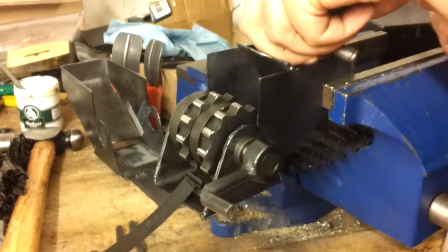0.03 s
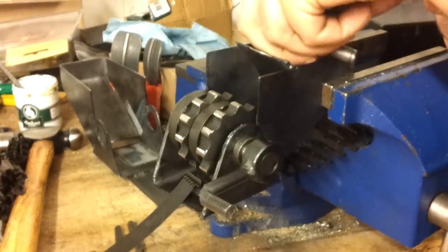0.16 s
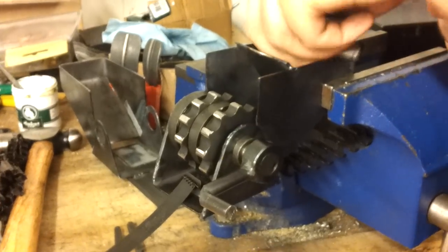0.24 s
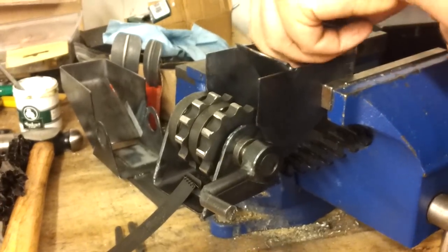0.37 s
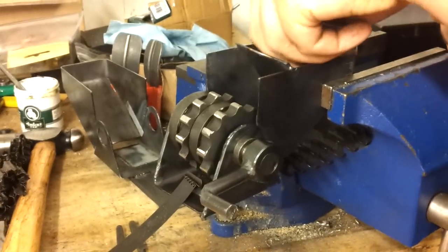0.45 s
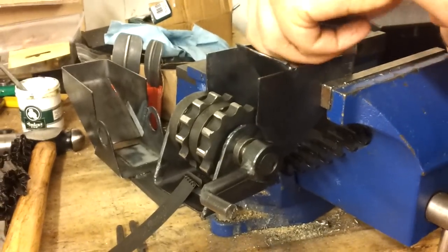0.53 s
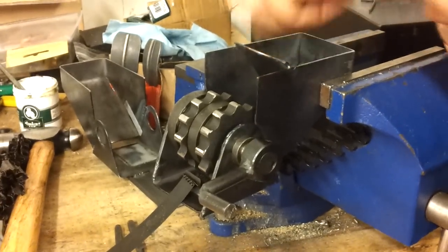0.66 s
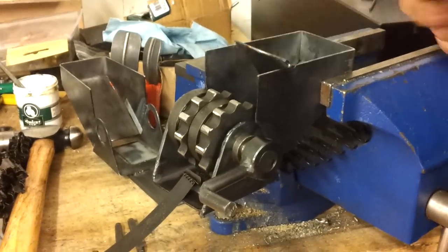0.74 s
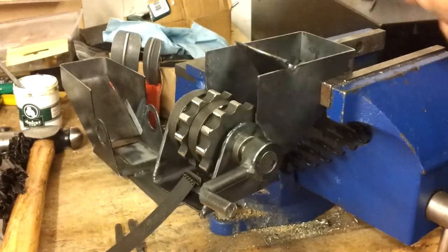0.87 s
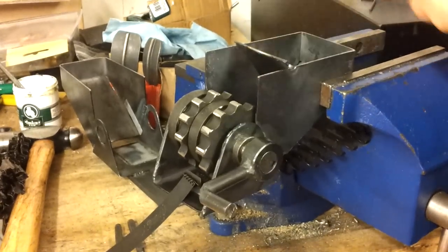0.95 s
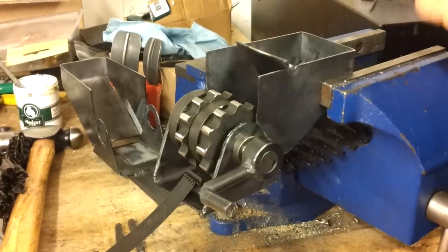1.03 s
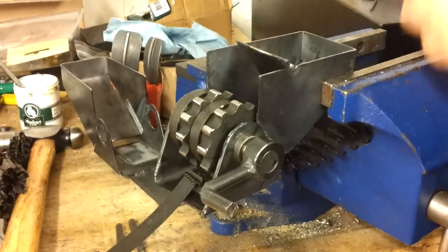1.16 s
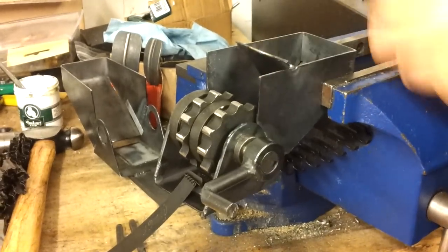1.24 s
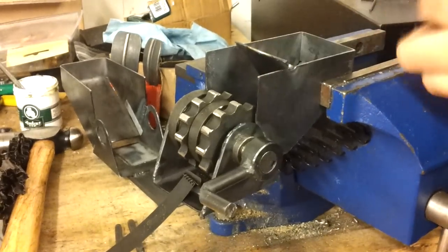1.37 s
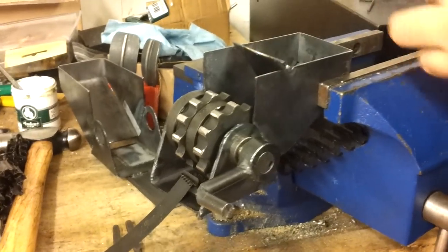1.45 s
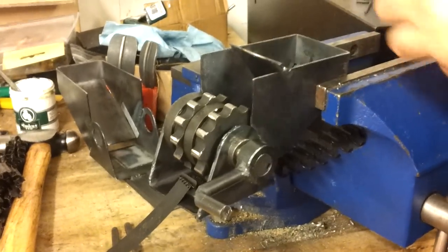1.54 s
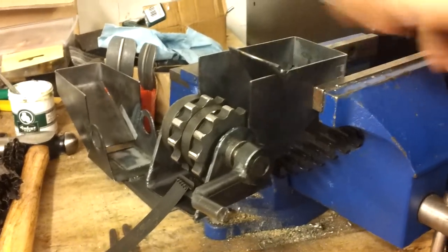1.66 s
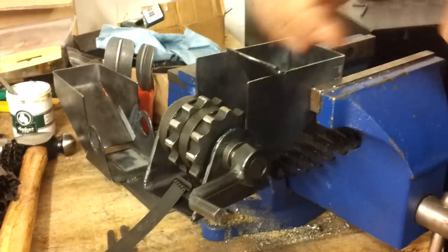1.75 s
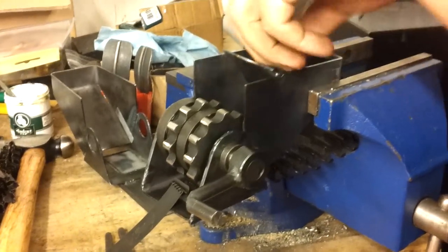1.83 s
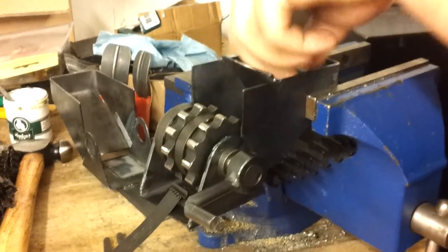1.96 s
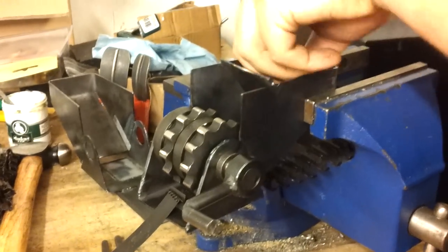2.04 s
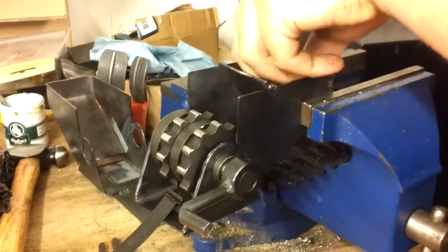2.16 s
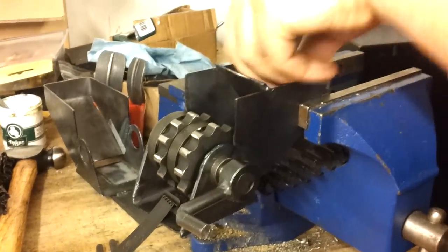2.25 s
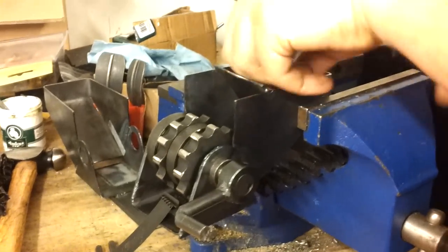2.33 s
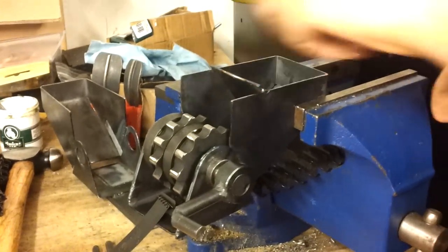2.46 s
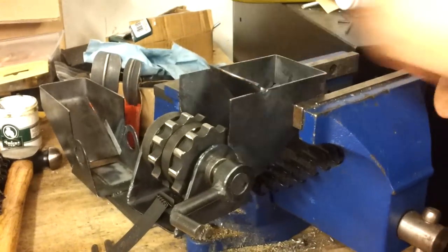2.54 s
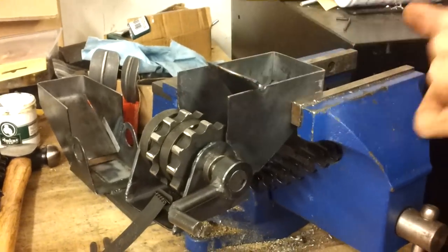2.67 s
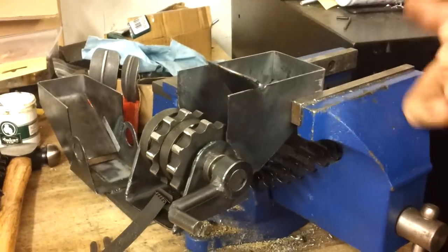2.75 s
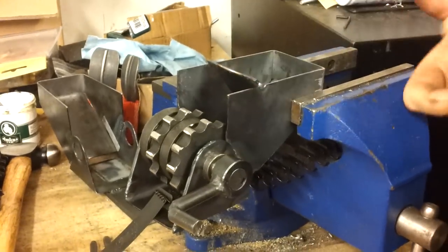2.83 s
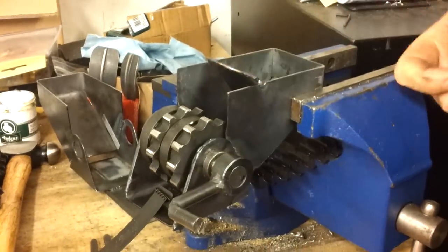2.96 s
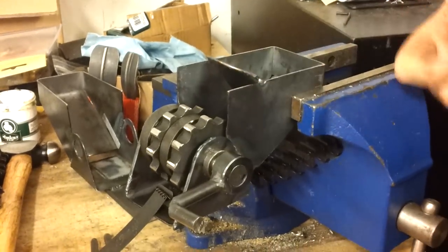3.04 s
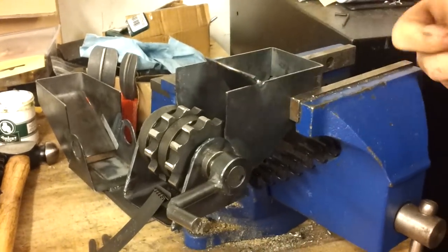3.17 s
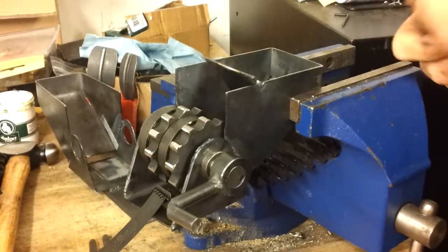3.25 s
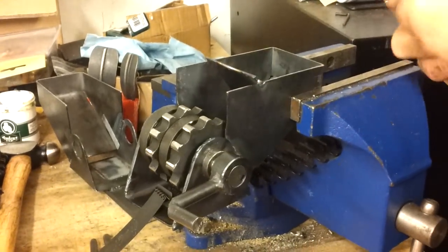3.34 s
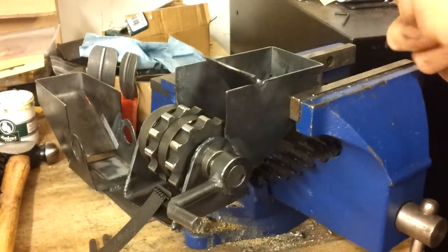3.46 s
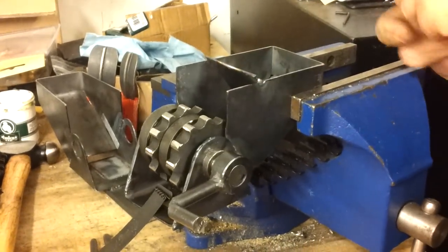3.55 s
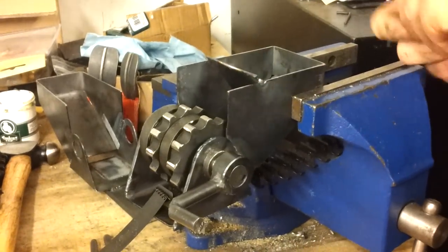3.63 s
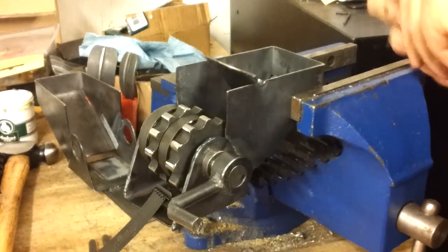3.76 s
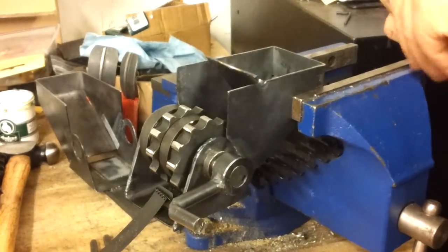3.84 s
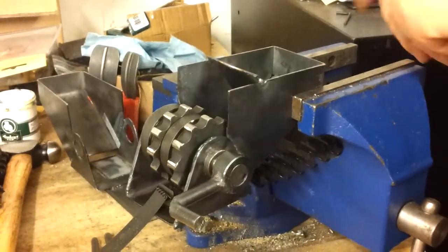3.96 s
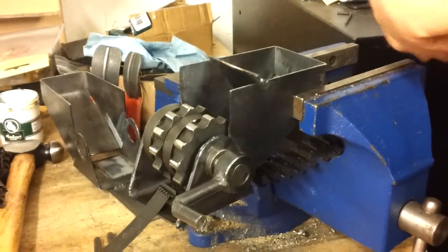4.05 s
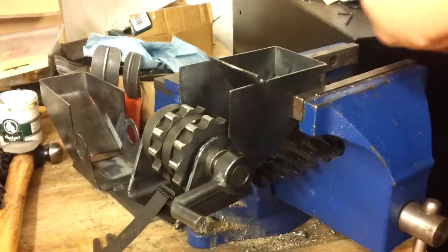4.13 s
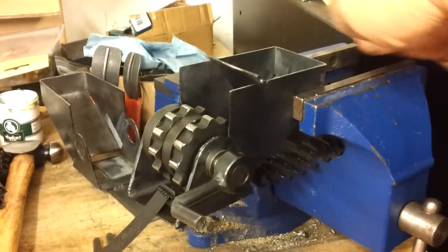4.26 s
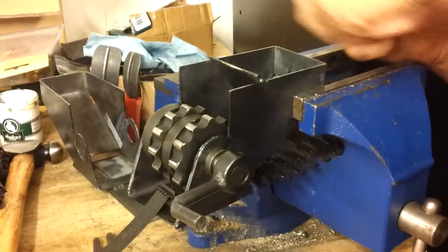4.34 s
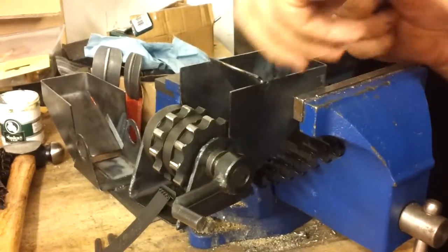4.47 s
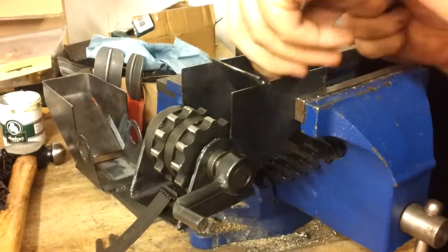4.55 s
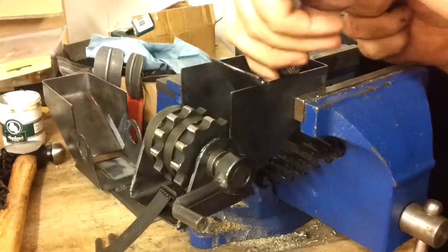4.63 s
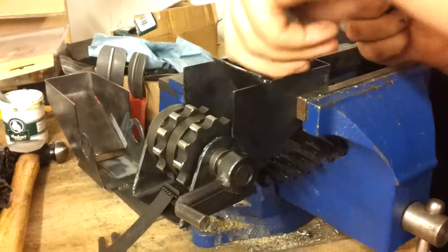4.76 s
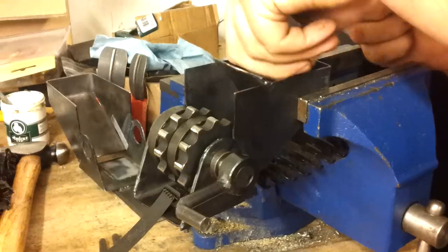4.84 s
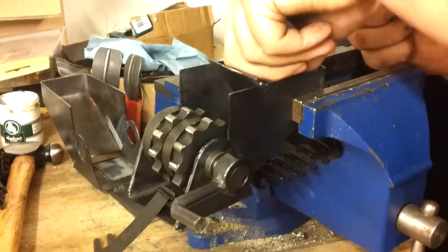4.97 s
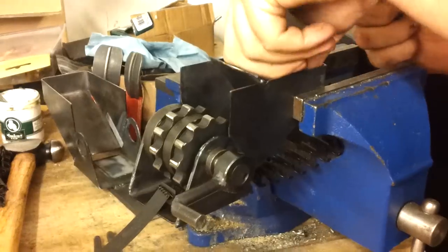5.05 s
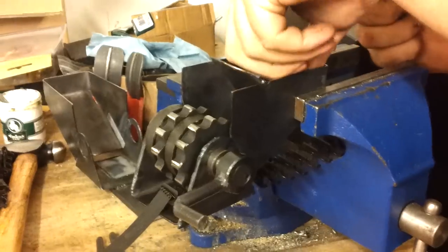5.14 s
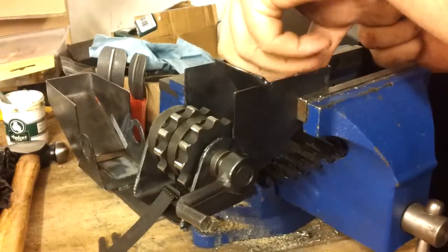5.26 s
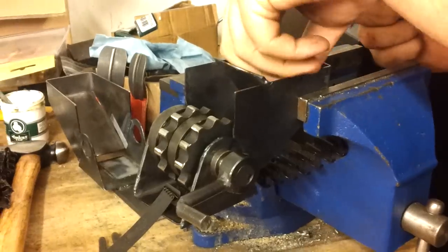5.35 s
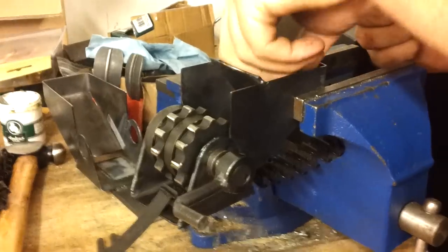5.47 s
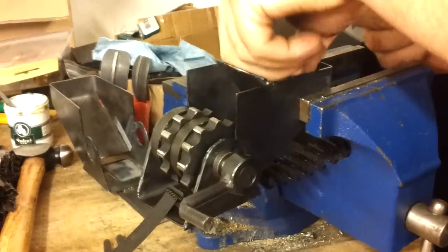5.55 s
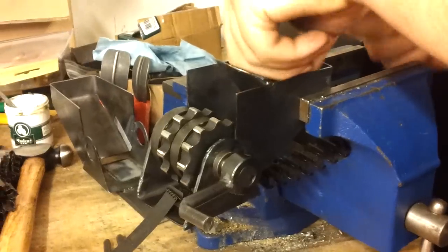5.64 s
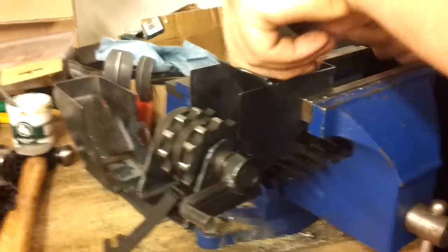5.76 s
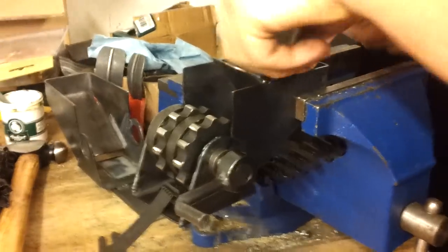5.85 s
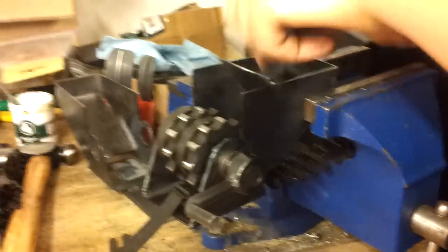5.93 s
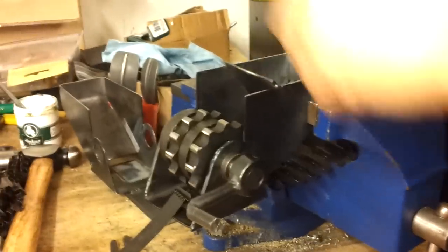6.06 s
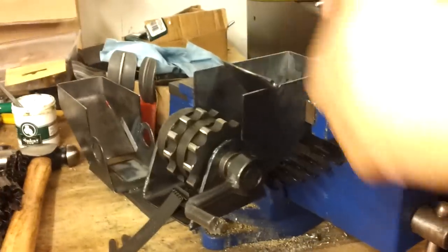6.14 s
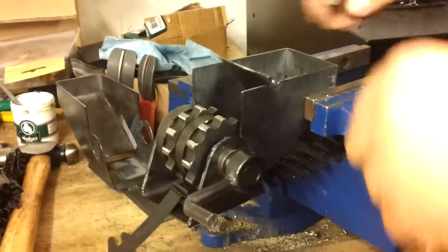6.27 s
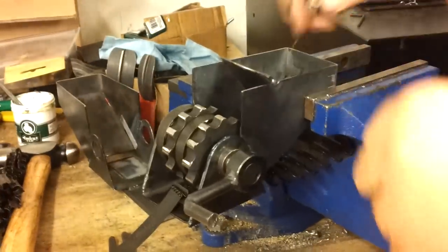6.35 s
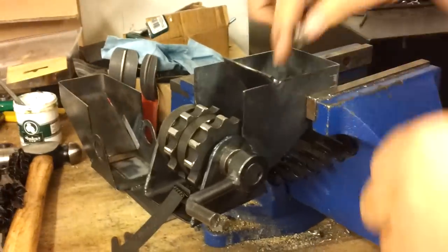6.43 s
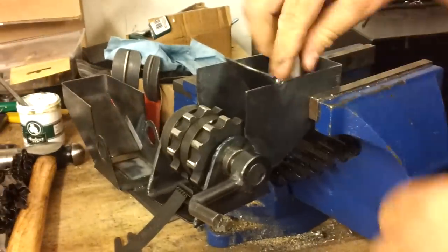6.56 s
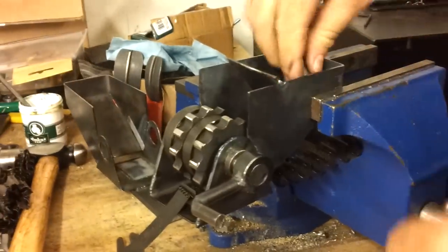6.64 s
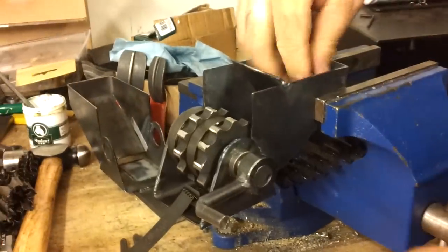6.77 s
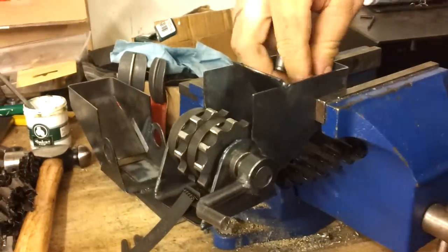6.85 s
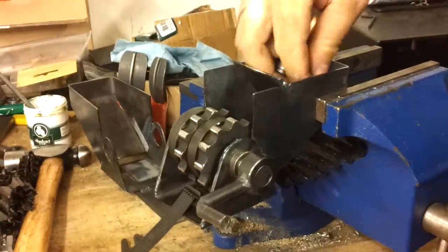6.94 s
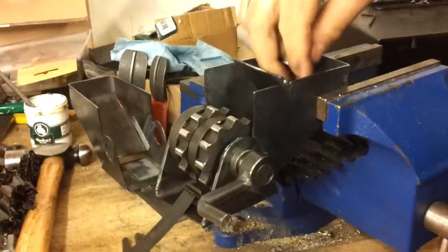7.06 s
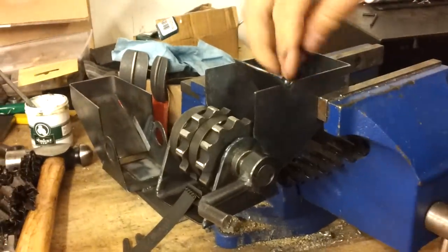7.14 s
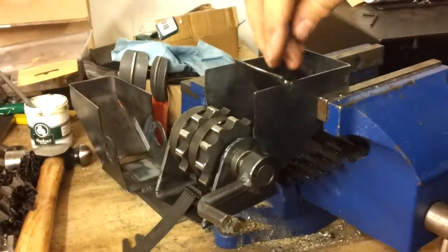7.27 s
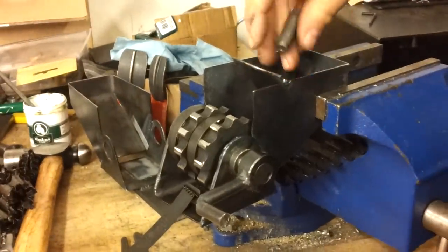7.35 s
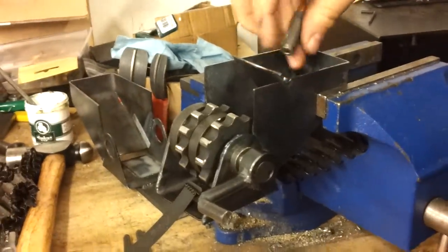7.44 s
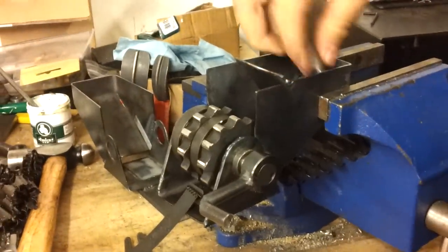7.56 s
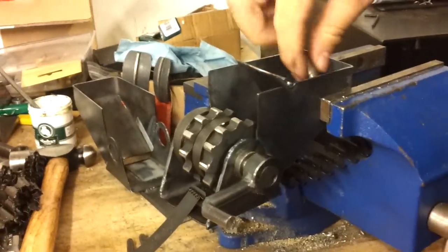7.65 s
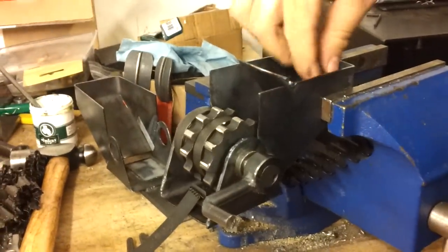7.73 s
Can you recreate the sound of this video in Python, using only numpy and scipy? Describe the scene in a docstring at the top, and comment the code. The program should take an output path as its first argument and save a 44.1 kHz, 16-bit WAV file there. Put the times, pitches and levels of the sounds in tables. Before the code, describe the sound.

Handfuls of metal cartridges clatter into a sheet-steel hopper in bursts, with tiny clinks in the fingers between them, in a quiet workshop.

```python
"""Metal cartridges drop by the handful into a sheet-steel hopper: clicks and patter ring damped modes,
with short buzzes and noise cracks; each blow also ticks, rings the side wall and thuds into a vice.
A few blows knock the bench. Between handfuls cases clink in the fingers, and a sleeve hisses by once.
Hiss, rumble and faint wavering tones make the room; sparse echoes follow the metal.
The output is nearly mono, ducked after loud blows, band limited and held below full scale."""
import sys
import numpy as np
from scipy import signal
from scipy.fft import rfft, irfft
from scipy.io import wavfile
from scipy.ndimage import uniform_filter1d, minimum_filter1d

SR = 44100
rng = np.random.default_rng(int(sys.argv[2]) if len(sys.argv) > 2 else 0)


def transcribe(signal):
    """Save signal, clipped to [-1, 1], as a 16-bit WAV file at the path in sys.argv[1]."""
    frames = np.atleast_2d(signal).T
    limited = np.clip(frames, -1, 1)
    pcm = np.round(limited * 32767).astype(np.int16)
    wavfile.write(sys.argv[1], SR, pcm)


N = 343980
TIME_S = np.arange(N) / SR

# cartridges striking the hopper: start_s, blow_db, boom_db (side wall above the blow)
HOPPER_BLOWS = [(0.002, -28.5, 1), (0.078, -28.5, 4.5), (0.156, -2, -9), (0.1641, -6.5, 10),
                (0.194, -12, 5.5), (0.2354, -23, 2.5), (0.292, -9.5, 0.5), (0.3189, -5.5, -3),
                (0.4372, -2, -6), (0.4461, -11, 14), (0.4744, -5.5, -10.5), (0.5162, -8.5, 5.5),
                (0.5404, -10.5, 0), (0.593, -23, 15), (0.625, -8.5, -5), (0.65, -10.5, -4.5),
                (1.8107, -4, -5.5), (1.85, -15, -11), (1.9211, -17, -30.5), (1.9747, -16.5, 5),
                (1.999, -28.5, -11), (2.1336, -2, 1.5), (2.149, -7, -6), (2.1769, -5, 2), (2.2163, -1, -1),
                (2.2727, -4, -12.5), (2.2851, -7, -1.5), (2.3084, -7, -0.5), (2.3539, -16.5, -19),
                (4.5328, -10, -8), (4.6055, -28, -4), (4.6554, -23.5, 3.5), (4.677, -26.5, 7),
                (4.691, -14.5, -13.5), (4.7, -4, -9), (4.8794, 0.5, 0), (4.9024, -10.5, -13),
                (4.9514, -1.5, -7.5), (5.002, -15, -38), (5.024, -3.5, 2), (5.0304, -7.5, -2),
                (5.0582, -12, 12), (5.0774, -5.5, -21), (5.1884, -2, -12), (5.206, -15.5, -1),
                (5.2297, -13.5, -22), (5.278, -21, -25), (5.3115, -10.5, -13), (5.338, -31, -10),
                (5.4309, -14.5, -15.5), (5.443, -22, -35), (5.5648, -19.5, -6), (5.5923, -16, -6),
                (5.6248, -4.5, -11), (5.6574, -30, -8), (5.671, -10, 2.5), (5.685, -1.5, -3.5),
                (5.701, -12.5, -30), (5.7681, -13, -0.5), (6.7582, -7, -14.5), (6.8368, -24.5, -19),
                (6.9296, -0.5, -13), (6.9908, -3.5, 2), (7.0797, -2.5, -25), (7.1153, -19, -41),
                (7.7142, -3, -30.5), (7.79, -14.5, -42.5)]
# cartridges touching in the hand: start_s, clink_db, tinkle_db (above the clink)
HAND_CLINKS = [(0.854, -32, 6.5), (0.873, -28.5, -1), (1.6087, -38.5, -30), (2.6717, -49, -21),
               (2.7052, -19.5, -14), (2.733, -32, 2), (2.853, -30.5, -4.5), (2.937, -36.5, -11),
               (3.01, -40.5, -18), (3.0636, -27, -12), (3.109, -38, -19), (3.221, -42.5, -15),
               (3.3325, -24, -13), (3.3403, -26.5, -8), (3.4386, -29, -2.5), (3.5056, -37, -14),
               (3.5687, -32.5, -10), (3.7452, -31.5, -20), (3.8144, -16.5, 0), (3.8516, -29, -1),
               (3.9016, -39, -20), (3.935, -34.5, -24), (4.0974, -27.5, -6), (4.225, -35, -15),
               (4.24, -42, -18), (4.285, -27, -7.5), (4.341, -40.5, -7), (5.9732, -40.5, -21),
               (6.4393, -28, -17), (6.7005, -41, -15)]
# blows felt in the bench: start_s, level_db
BENCH_KNOCKS = [(0.152, -37.5), (1.81, -42), (5.682, -34.5), (6.761, -41), (6.989, -32)]
# fingers shifting the cases: time_s, level_db
FINGER_RUSTLE = [(2.62, -49), (3.3, -64), (3.9, -54), (4.5, -52.5)]
# modes of the hopper: pitch_hz, level_db, t60_s
HOPPER_MODES = [(1276, -5.5, 0.26), (1345, -3.5, .15), (1402, -0.5, 0.16), (1499, 0, 0.034),
                (1677, 1, 0.08), (1970, 5.5, 0.048), (2083, -4, 0.27), (2129, -3.5, .15), (2571, 4.5, 0.16),
                (3010, -6.5, 0.08), (3060, 3, 0.2), (3160, -25, 0.17), (3790, -17, 0.2), (4480, -9, .15),
                (4842, -3, 0.15), (5450, -4, .18), (5490, -3.5, 0.08), (5980, -15.5, 0.2),
                (6636, -4, 0.099), (6745, -1, 0.3), (7200, -3, 0.056), (7625, -5.5, 0.18),
                (8360, -18.5, 0.22), (9460, -2.5, 0.23), (10980, 0, .11), (11900, 1.5, 0.22),
                (12470, -7, .06)]
# modes of a cartridge case: pitch_hz, level_db, t60_s
CASE_MODES = [(2317, 4.5, 0.033), (4530, -7.5, 0.03), (5340, -6.5, .035), (6230, -3, .05),
              (6780, -1.5, 0.042), (7270, -1, 0.052), (7870, -5.5, .05), (9060, -1.5, 0.043),
              (12000, -31, .04), (11630, 6, 0.11), (12170, 5.5, .03)]
# edges of the four contact bands (boom, plate or body, main, tinkle): edge_hz
BAND_EDGES_HZ = [1050, 1650, 3450, 8800, 14500]
# sleeve passing: time_s, level_db
SLEEVE_LEVEL = [(6.04, -60), (6.21, -48.5), (6.32, -65)]
# sleeve spectrum: freq_hz, density_db (relative, per Hz)
CLOTH_SPECTRUM = [(590, -41), (1000, -14), (1970, 0.5), (3310, -8), (7210, -1), (9950, -17), (12000, -24),
                  (15600, -51), (22000, -120)]
# room hiss spectrum: freq_hz, density_db (relative, per Hz)
AIR_SPECTRUM = [(400, -12), (800, -1), (1500, -4.5), (3000, -9.5), (7000, -12), (14500, -15)]
# rumble spectrum: freq_hz, density_db (relative, per Hz)
RUMBLE_SPECTRUM = [(15, -59), (25, -28), (65, -2), (330, -7), (360, 6), (387, -8.5), (800, -10.5),
                   (1040, -36), (1760, -120)]
# rumble swells: time_s, level_db
RUMBLE_LEVEL = [(0, -42), (.14, -51), (.25, -63), (1.5, -59.5), (2.6, -60.5), (3.5, -57), (4.4, -53.5),
                (5, -55), (6.05, -64.5), (6.25, -57.5), (6.5, -60), (7.8, -62.5)]
# room hum tones: pitch_hz, level_db (before the lift and waver in room_tone)
HUM_TONES = [(177.6, -71), (301.5, -68.5), (360.7, -63), (409.1, -70), (479.1, -65), (662.1, -72)]
# echo decay: freq_hz, t60_s
ROOM_DECAY = [(1000, 0.28), (3000, 0.43), (7000, 0.41), (13000, 0.1143)]
# channel difference: freq_hz, level_db (relative to the centre)
SIDE_SPECTRUM = [(60, -25), (380, -34.5), (2360, -61), (14800, -39.5)]

AIR_DB = -58
# mid plate band above the blow; grows as the hopper fills
PLATE_START_DB, PLATE_DB_PER_S, PLATE_DB_PER_BOOM_DB = -9.5, 0.8847, 0.14
# treble of the cases above the blow; dulls as the hopper fills
TINKLE_START_DB, TINKLE_DB_PER_S, TINKLE_SPREAD_DB = -8.5, -0.71, 2
# loose cartridges roll on after each blow: level relative to it, settling time constant
ROLL_DB, ROLL_S = -36.5, 0.085
# free ring of the lowest hopper mode, relative to the blow; weaker as the hopper fills
WALL_START_DB, WALL_DB_PER_S, WALL_DB_PER_BOOM_DB, WALL_T60_S = -17.5, -1.57, 0.22, 0.5
# dull note of the vice, relative to the blow
THUD_DB, THUD_HZ, THUD_T60_S = -57.5, 709, 0.06
# first hard contact, relative to the blow
TICK_DB, TICK_S, TICK_HIGHPASS_HZ = -9, 0.00062, 3200
# body knock of a case relative to the clink, mid and low
BODY_DB, BODY_LOW_DB, BODY_SPREAD_DB = -22, -36, 3
BAND_LIMIT_HZ = 14600


def gain_of(db):
    """Amplitude factor for a level in dB."""
    return 10 ** (np.asarray(db) / 20)


def evened(x):
    """Scale to unit RMS."""
    return x / np.sqrt(np.mean(x ** 2) + 1e-20)


def read(points, hz):
    """Interpolate a table over log frequency."""
    freq_hz, value = np.transpose(points)
    return np.interp(np.log(hz + 1), np.log(freq_hz + 1), value)


def curve(rows):
    """Gain along a level curve, silent outside it."""
    time_s, level_db = np.transpose(rows)
    return gain_of(np.interp(TIME_S, time_s, level_db, -200, -200))


def coloured(x, points):
    """Weight the spectrum by a dB table."""
    weight = gain_of(read(points, np.fft.rfftfreq(N, 1 / SR)))
    return irfft(rfft(x) * weight, N)


def train(start_s, size):
    """Clicks of the given sizes at the given times."""
    index = np.clip(np.round(start_s * SR).astype(int), 0, N - 1)
    return np.bincount(index, size, N)


def fading(x, tau_s):
    """Each click leaves an exponential tail."""
    return signal.lfilter([1], [1, -np.exp(-1 / (tau_s * SR))], x)


def ring(push, hz, t60_s):
    """Two-pole damped mode; a unit click makes it peak near one."""
    radius = gain_of(-60 / (t60_s * SR))
    angle = 2 * np.pi * hz / SR
    return signal.lfilter([np.sin(angle)], [1, -2 * radius * np.cos(angle), radius * radius], push)


def smooth_noise(width):
    """Slow unit-RMS noise, averaged twice over width samples."""
    return evened(uniform_filter1d(uniform_filter1d(rng.standard_normal(N), width), width))


def patter_sizes(rate_per_s, scale_db, cap):
    """Random sparse small knocks with exponentially spread dB sizes."""
    size = gain_of(scale_db * np.minimum(rng.exponential(1, N), cap))
    return size * (rng.random(N) < rate_per_s / SR)


def room_tone():
    """Steady hiss, a low rumble that swells with movement nearby, and wavering hum tones."""
    air = gain_of(AIR_DB) * evened(coloured(rng.standard_normal(N), AIR_SPECTRUM))
    rumble = curve(RUMBLE_LEVEL) * evened(coloured(rng.standard_normal(N), RUMBLE_SPECTRUM))
    hum = np.zeros(N)
    for hz, db in HUM_TONES:
        waver = smooth_noise(1500)
        phase_rad = 2 * np.pi * hz * TIME_S + 1.06 * waver
        hum += gain_of(db + 2.0 + 0.5 * waver) * np.sin(phase_rad)
    return air + rumble + hum


def struck(start_s, band_db, modes, loose, spot_db, ring_db, buzz_db, buzz_t60_2khz_s,
           chatter_s, crack_db, crack_s):
    """Blows ring the modes, each by where it lands; the chattering contact adds a short buzz and a crack."""
    # random landing spot: one half of the columns sets mode levels, the other their signs
    spot = rng.standard_normal((len(start_s), 2 * len(modes)))
    # the other end of the cartridge lands 5-10 ms later
    rebound_s = start_s + .005 + .005 * rng.random(len(start_s))
    patter = [loose, loose, loose, loose * gain_of(-5.0)]  # small knocks are softer, so duller
    out = np.zeros(N)
    for k, (hz, db, t60_s) in enumerate(modes):
        band = np.clip(np.searchsorted(BAND_EDGES_HZ, hz) - 1, 0, len(BAND_EDGES_HZ) - 2)
        size = gain_of(band_db[band] + spot_db * spot[:, k])
        noise = rng.standard_normal(N)

        # free ring; higher modes keep less of the blow
        free = gain_of(ring_db - 11.0 * np.log2(hz / 1300))
        flutter = 1 + 0.32 * evened(uniform_filter1d(noise, 300))  # loose metal touching the plate
        blows = train(start_s, free * size * np.sign(spot[:, -k - 1]))
        push = blows + free.mean() * patter[band] * noise
        out += gain_of(db) * flutter * ring(push, hz, t60_s)

        # buzz, damped while touching
        touch = train(start_s, size) + 0.53 * train(rebound_s, size) + patter[band]
        chatter = fading(touch, chatter_s) * np.sign(noise) / np.sqrt(chatter_s * SR)
        buzz_t60_s = buzz_t60_2khz_s * (2000 / hz) ** 0.28
        out += gain_of(db + buzz_db) * ring(chatter, hz, buzz_t60_s)

    for k, db in enumerate(band_db):
        sos = signal.butter(3, BAND_EDGES_HZ[k:k + 2], "bandpass", fs=SR, output="sos")
        noise = evened(signal.sosfilt(sos, rng.standard_normal(N)))
        size = gain_of(db)
        touch = train(start_s, size) + 0.08 * train(rebound_s, size) + patter[k]
        out += gain_of(crack_db[k]) * noise * fading(touch, crack_s)

    no_bass = signal.butter(8, 1150, "highpass", fs=SR, output="sos")  # small plates radiate no bass
    return signal.sosfilt(no_bass, out)


def hopper():
    """Blows, each followed by random patter; the plates ring less freely as the hopper fills."""
    start_s, blow_db, boom_db = np.transpose(HOPPER_BLOWS)
    plate_db = PLATE_START_DB + PLATE_DB_PER_S * start_s + PLATE_DB_PER_BOOM_DB * boom_db
    spread_db = TINKLE_SPREAD_DB * rng.standard_normal(len(start_s))
    tinkle_db = TINKLE_START_DB + TINKLE_DB_PER_S * start_s + spread_db
    band_db = blow_db + [boom_db, plate_db, 0 * blow_db, tinkle_db]
    rolling = fading(train(start_s, gain_of(blow_db)), ROLL_S)
    loose = gain_of(ROLL_DB) * patter_sizes(160, 1.76, 4) * rolling
    return struck(start_s, band_db, HOPPER_MODES, loose, spot_db=4.0, ring_db=-12.5 - 1.3 * start_s,
                  buzz_db=-6.5, buzz_t60_2khz_s=0.021, chatter_s=0.0034,
                  crack_db=[-26.5, -15, -13, -17.5], crack_s=0.0061)


def wall_and_vice():
    """Every blow ticks, sets the side wall humming on its lowest mode and thuds into the vice."""
    start_s, blow_db, boom_db = np.transpose(HOPPER_BLOWS)
    sign = rng.choice([-1., 1.], len(start_s))
    wall_db = WALL_START_DB + WALL_DB_PER_S * start_s + blow_db + WALL_DB_PER_BOOM_DB * boom_db
    wall = ring(train(start_s, sign * gain_of(wall_db)), HOPPER_MODES[0][0], WALL_T60_S)
    jolt = fading(train(start_s, gain_of(THUD_DB + blow_db)), .006) * rng.standard_normal(N)
    thud = ring(jolt, THUD_HZ, THUD_T60_S)
    tick = fading(train(start_s, gain_of(TICK_DB + blow_db)), TICK_S) * rng.standard_normal(N)
    bright = signal.butter(2, TICK_HIGHPASS_HZ, "highpass", fs=SR, output="sos")
    return wall + thud + signal.sosfilt(bright, tick)


def workshop(x, count=3):
    """Sparse random-sign echoes decaying by frequency; the patterns blend in a 23 Hz cycle."""
    out = np.zeros(N)
    slots = np.arange(200, SR // 2 - 20, 20)
    for k in range(count):
        taps = np.zeros(SR // 2)
        at = slots + rng.integers(0, 20, len(slots))
        taps[at] = rng.choice([-1., 1.], len(slots))
        hz, t_s, spectrum = signal.stft(taps, SR, nperseg=256)
        decay = gain_of(-60 * t_s / read(ROOM_DECAY, hz)[:, None])
        tail = signal.istft(spectrum * decay, SR, nperseg=256)[1]
        share = np.sqrt(2 / count) * np.cos(2 * np.pi * (23 * TIME_S + k / count))
        out += signal.fftconvolve(x * share, tail / np.linalg.norm(tail))[:N]
    return out


def bench():
    """A few blows pass a dull knock through the vice into the bench top: short bursts of low noise."""
    start_s, level_db = np.transpose(BENCH_KNOCKS)
    sos = signal.butter(2, [90, 900], "bandpass", fs=SR, output="sos")
    noise = evened(signal.sosfilt(sos, rng.standard_normal(N)))
    return noise * fading(train(start_s, gain_of(level_db)), .008)


def handful():
    """Thin cases touching: almost no boom, short bright rings, a faint rustle of smaller touches."""
    start_s, clink_db, tinkle_db = np.transpose(HAND_CLINKS)
    grip_db = BODY_SPREAD_DB * rng.standard_normal(len(start_s))
    band_db = clink_db + [BODY_LOW_DB + grip_db, BODY_DB + grip_db, 0 * clink_db, tinkle_db]
    loose = patter_sizes(70, 1.44, 3) * curve(FINGER_RUSTLE)
    return struck(start_s, band_db, CASE_MODES, loose, spot_db=3.5, ring_db=-26,
                  buzz_db=-1, buzz_t60_2khz_s=0.016, chatter_s=0.002,
                  crack_db=[-22, 2, -1.5, -6.5], crack_s=0.00073)


def sleeve():
    """Cloth brushing past: a short soft hiss of shaped noise."""
    hiss = evened(coloured(rng.standard_normal(N), CLOTH_SPECTRUM))
    return uniform_filter1d(curve(SLEEVE_LEVEL), 900) * hiss


def scene():
    """Sum the sources and echoes; the two channels differ only by a faint flicker."""
    steel, hand = hopper(), handful()
    echoes = workshop(gain_of(-9) * steel + gain_of(-7.5) * hand)
    mid = steel + hand + echoes + wall_and_vice() + bench() + sleeve() + room_tone()
    side = coloured(mid * smooth_noise(400), SIDE_SPECTRUM)
    return np.array([mid + side, mid - side])


def record(dry):
    """Gain control ducks loud blows and what follows; then a band limit and a peak limiter."""
    power_db = 10 * np.log10(abs(uniform_filter1d((dry ** 2).mean(0), 200)) + 1e-12)
    fall_db = TIME_S * 60.  # the held level falls 60 dB a second
    held_db = np.maximum.accumulate(power_db + fall_db) - fall_db
    over_db = np.maximum(held_db + 17.0, 0)  # threshold -17 dB
    ducked = dry / gain_of(0.1 * uniform_filter1d(over_db, 300))
    lowpass = signal.firwin(255, BAND_LIMIT_HZ, window=("kaiser", 9), fs=SR)
    cut = signal.oaconvolve(ducked, lowpass[None], "same")
    peak = -minimum_filter1d(-abs(cut).max(0), 81)
    return cut / np.maximum(uniform_filter1d(peak, 41), 1)


dry = scene()
out = record(dry)
transcribe(out)
```